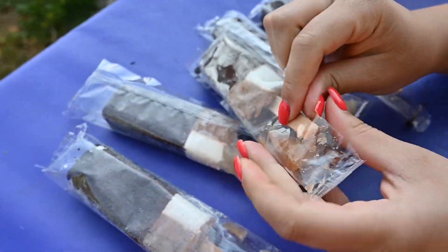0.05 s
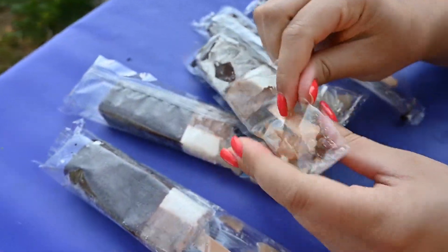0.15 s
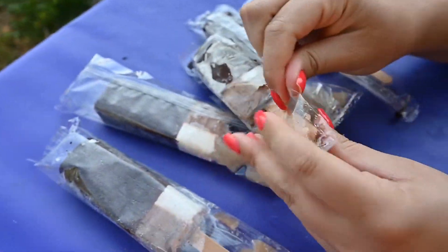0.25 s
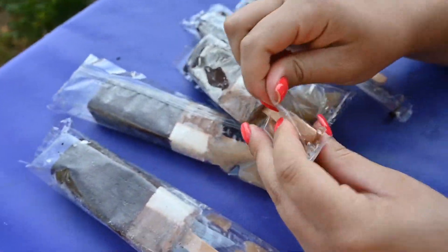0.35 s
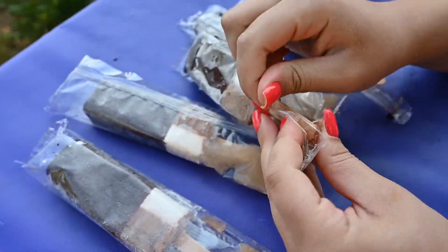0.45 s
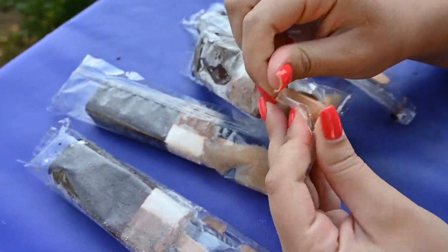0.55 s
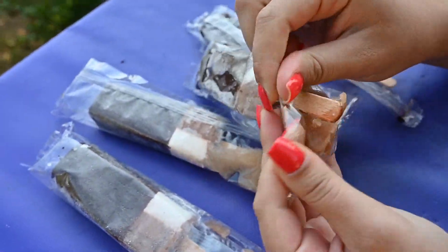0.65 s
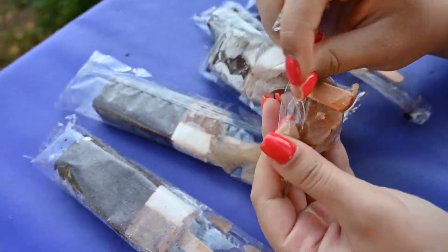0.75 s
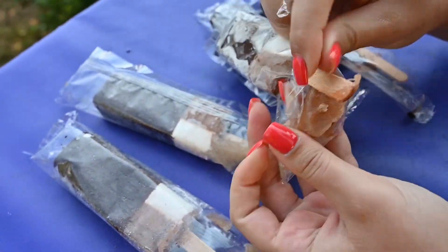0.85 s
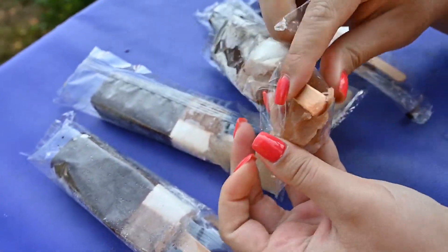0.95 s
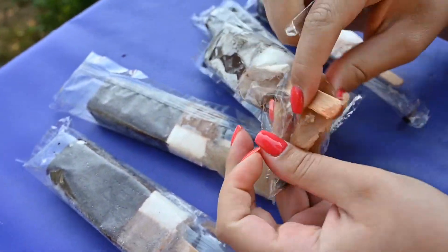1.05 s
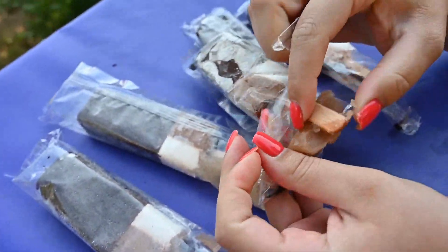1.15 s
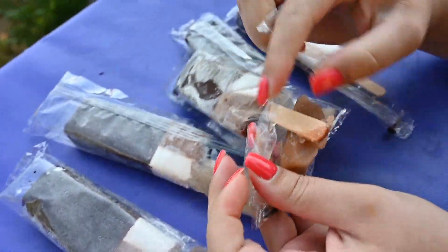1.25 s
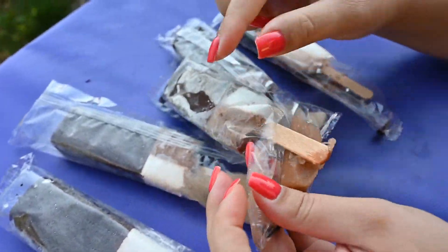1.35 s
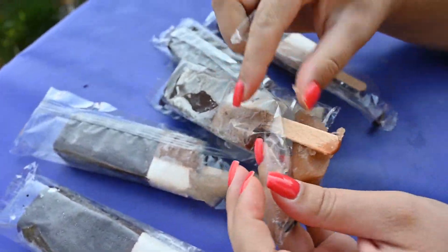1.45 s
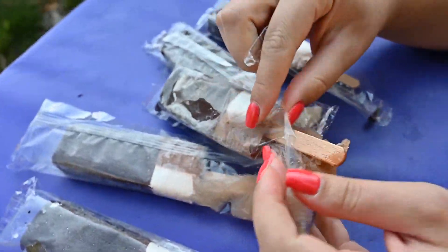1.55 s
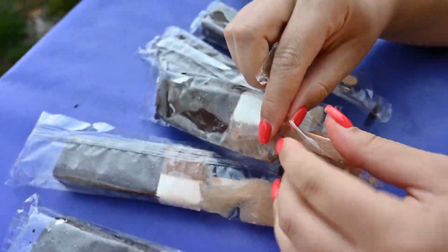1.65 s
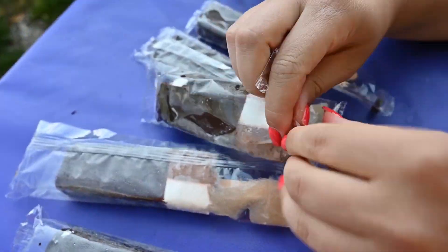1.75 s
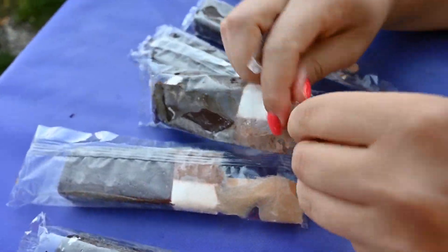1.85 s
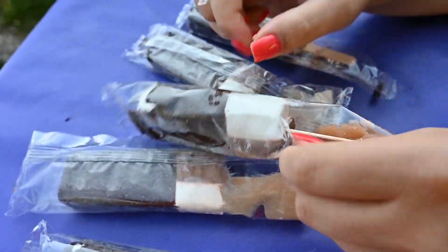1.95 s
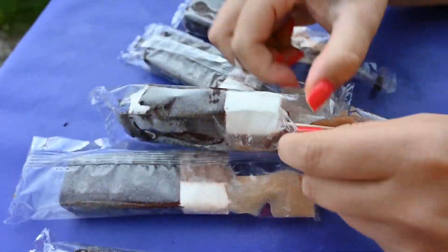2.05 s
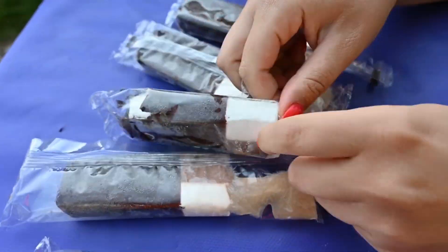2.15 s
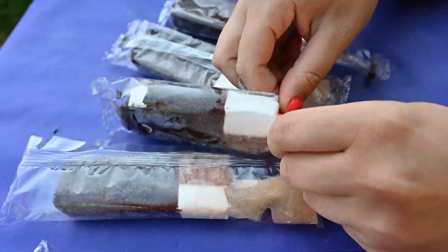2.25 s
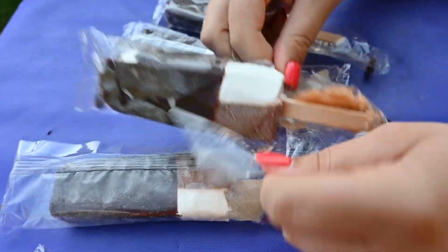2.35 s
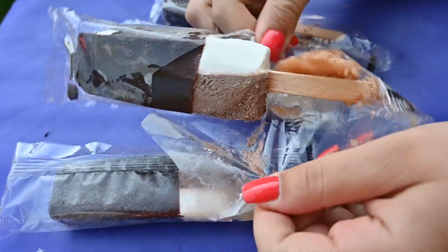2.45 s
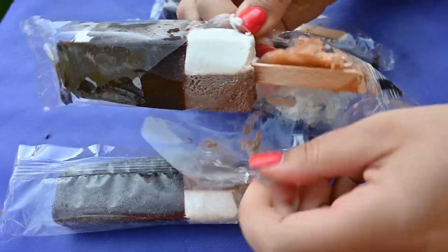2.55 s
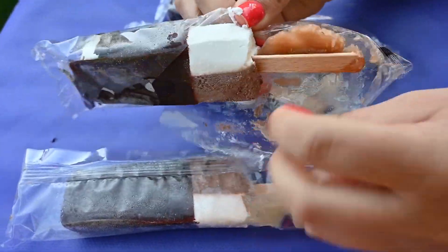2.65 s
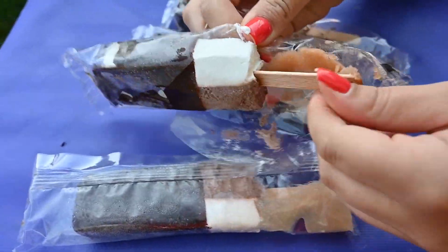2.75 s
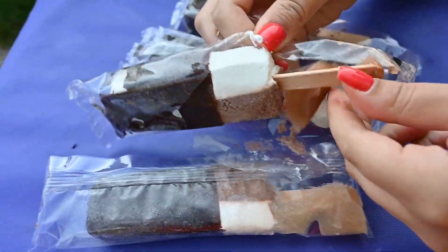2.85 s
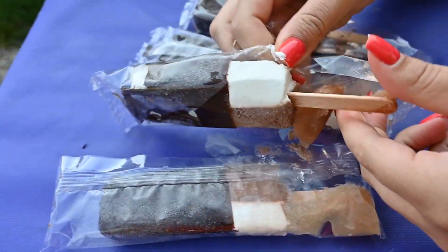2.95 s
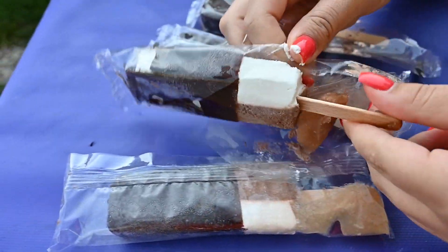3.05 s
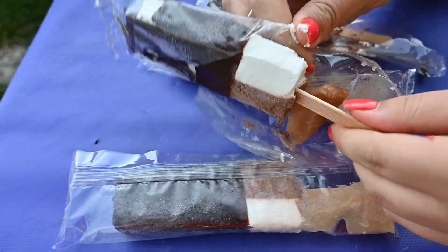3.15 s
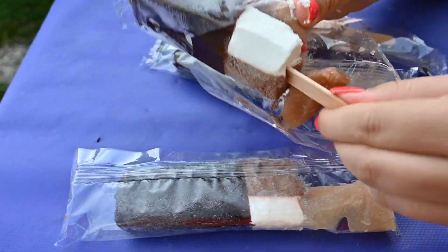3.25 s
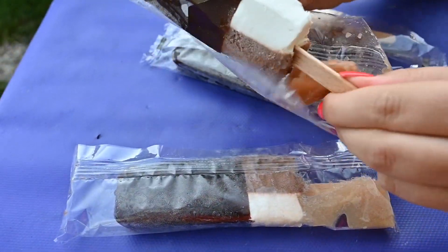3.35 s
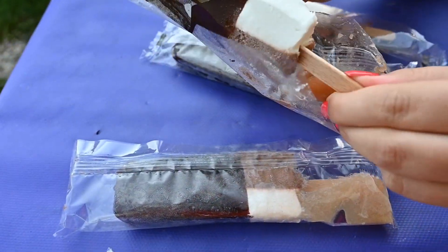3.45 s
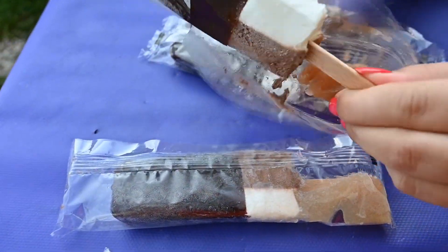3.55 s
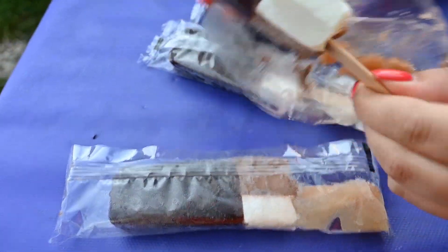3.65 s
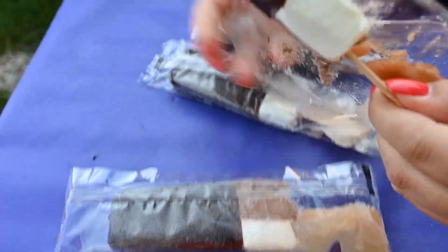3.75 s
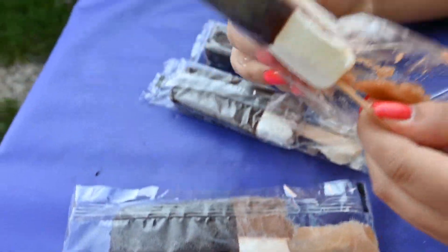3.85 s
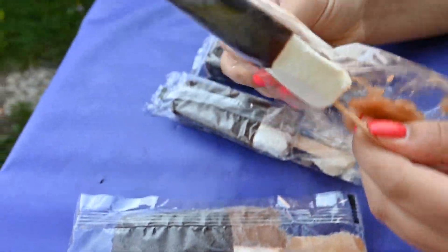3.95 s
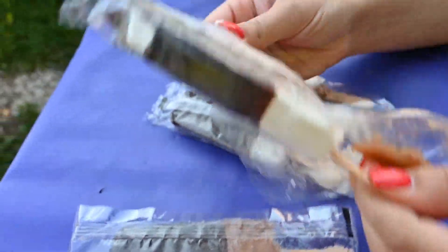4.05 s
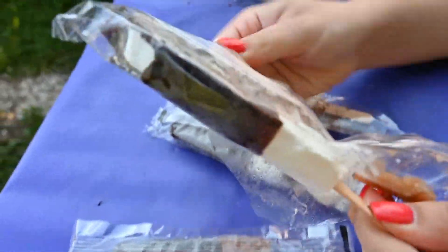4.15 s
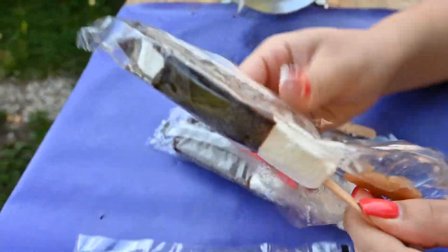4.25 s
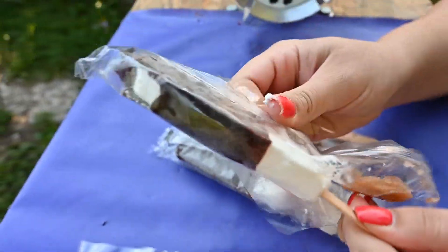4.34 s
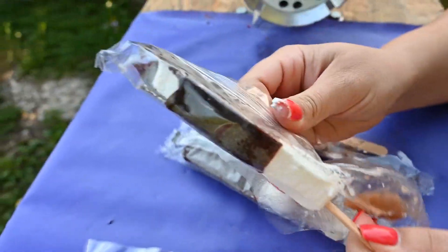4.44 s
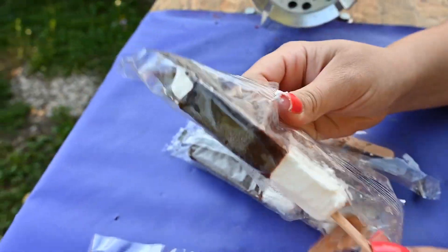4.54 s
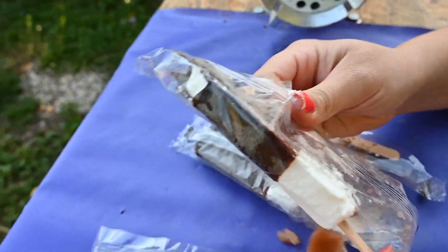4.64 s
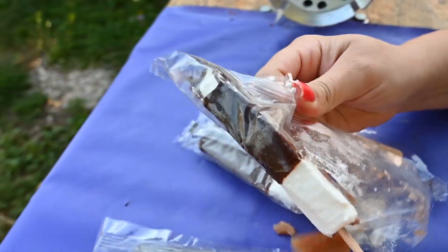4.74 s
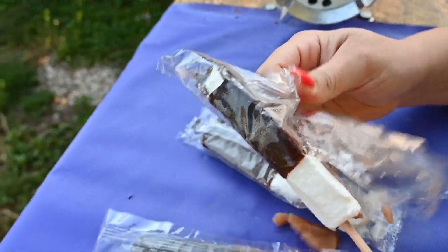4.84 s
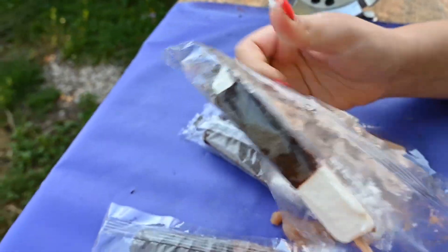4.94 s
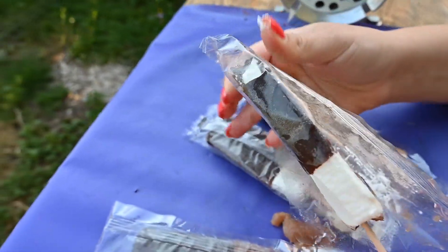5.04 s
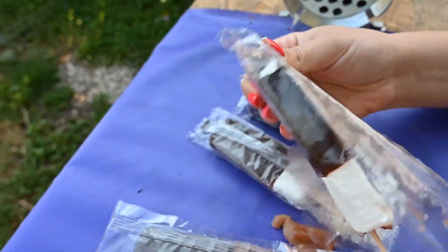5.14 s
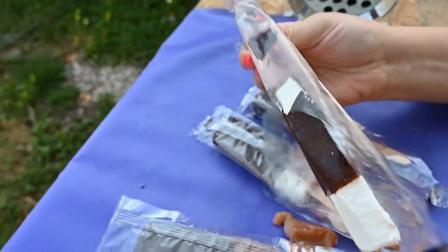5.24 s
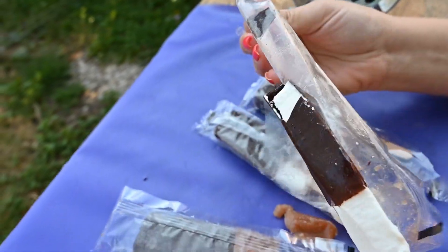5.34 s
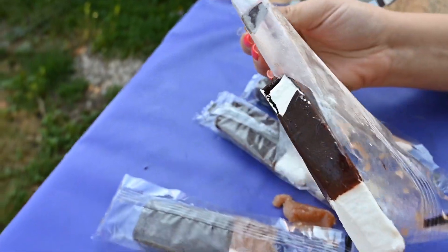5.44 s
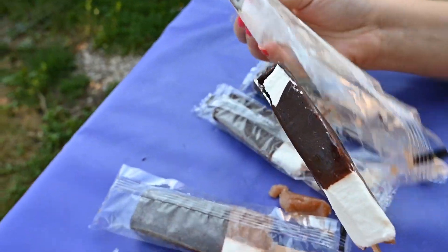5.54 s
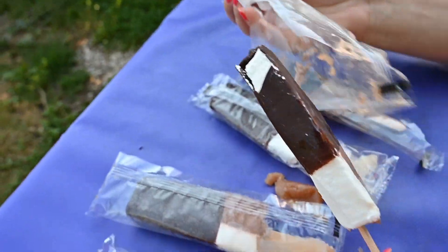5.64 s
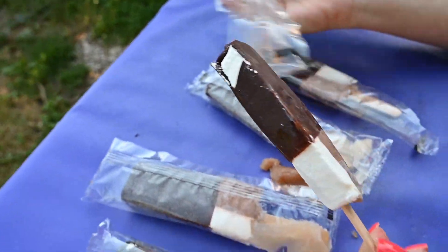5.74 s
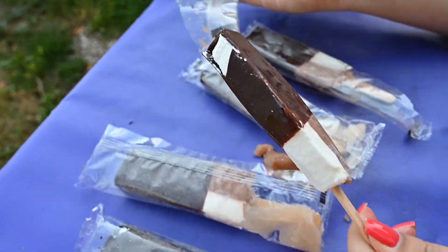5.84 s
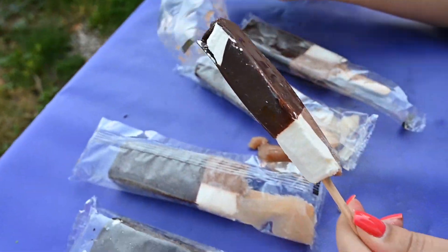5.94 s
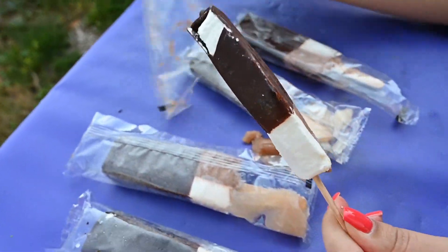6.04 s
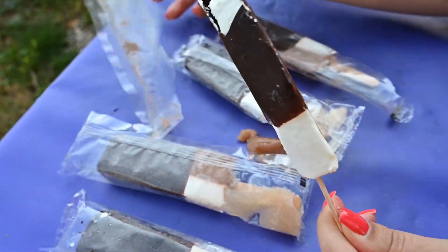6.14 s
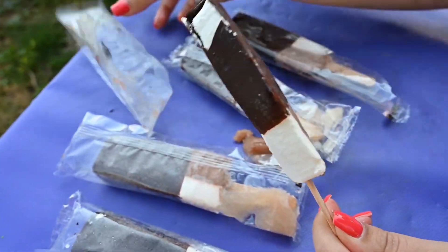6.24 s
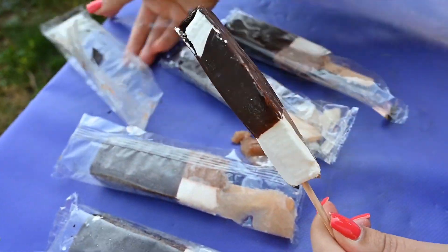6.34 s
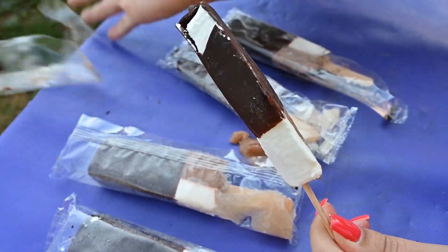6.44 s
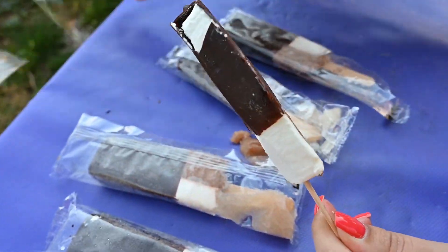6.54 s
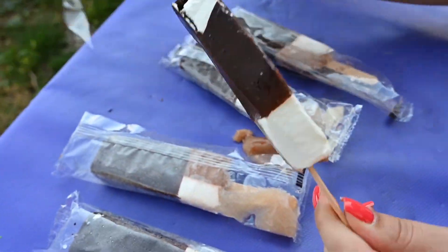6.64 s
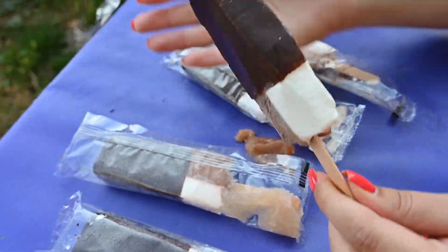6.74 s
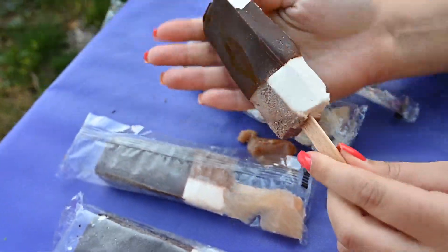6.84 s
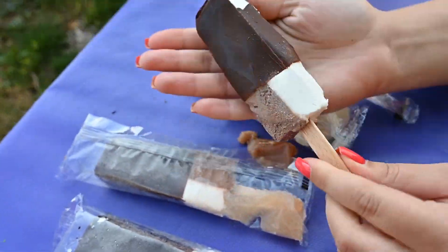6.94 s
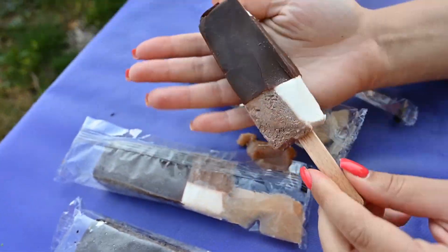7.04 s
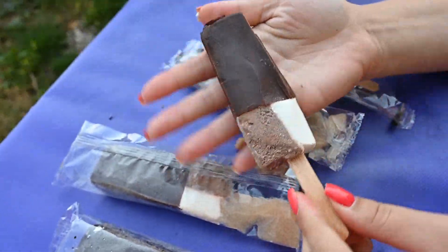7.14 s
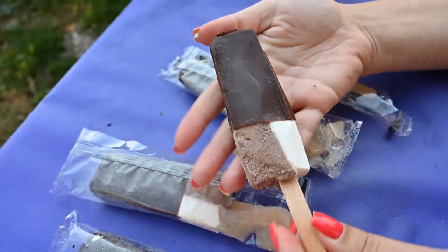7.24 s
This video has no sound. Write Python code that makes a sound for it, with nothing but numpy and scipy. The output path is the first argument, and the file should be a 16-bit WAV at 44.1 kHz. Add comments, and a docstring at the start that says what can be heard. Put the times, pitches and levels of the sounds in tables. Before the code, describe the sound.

Thin plastic wrappers crinkle and snap sharply under busy fingers outdoors, with hollow pocket pops, soft table bumps and a faint distant bird.

```python
"""Hands crinkle thin plastic wrappers on a garden table: creases buckle as noise bursts over dense crackle and rustle,
and each crease puffs through the resonant air pocket near 1 kHz, over filtered-noise rumble and slow breeze pressure.
After a second a far small bird joins in with gliding, noisy sine whistles and echoes; from 2.5 s the table top rings
to soft bumps. Just past 3 s the bag is torn open and its pocket rings lower. Near 6.2 s the breeze swells,
then the hands grow quieter while the bird calls again."""
import sys
import numpy as np
from scipy import signal
from scipy.fft import rfft, irfft, next_fast_len
from scipy.io import wavfile
from scipy.ndimage import uniform_filter1d, map_coordinates

SR = 44100
rng = np.random.default_rng(int(sys.argv[2]) if len(sys.argv) > 2 else 0)


def store_wav(level_fs):
    """Save 16-bit WAV to argv[1]."""
    pcm = np.round(np.clip(np.atleast_2d(level_fs), -1, 1) * 32767)
    wavfile.write(sys.argv[1], SR, pcm.T.astype(np.int16))


N = 321489


def amp(db):
    """Level to amplitude: 20 dB is a factor of ten."""
    return 10 ** (np.asarray(db) / 20)


def unit(x):
    """Normalisation to an RMS value of 1."""
    return x / np.sqrt(np.mean(x ** 2) + 1e-20)


def along(points, hz):
    """Interpolation of (frequency [Hz], value) points on a logarithmic frequency axis."""
    f, v = np.transpose(points)
    return np.interp(np.log(hz + 1), np.log(f + 1), v)


def curves(rows, s):
    """Linear interpolation in time: the columns after the time, read at times s."""
    t, *cols = np.transpose(rows)
    return [np.interp(s, t, c) for c in cols]


def filtered(x, response):
    """Linear filtering: the spectrum of x times a complex response, along the last axis."""
    n = x.shape[-1]
    m = next_fast_len(n + min(n, SR // 4))
    return irfft(rfft(x, m) * response(np.fft.rfftfreq(m, 1 / SR)), m)[..., :n]


def resonance(f, hz, width):
    """Damped oscillator: a causal band-pass response of gain 1 at its centre."""
    return 1j * f * width / (hz * hz - f * f + 1j * f * width + 1e-9)


def paired(x, alike):
    """Mid-side mixing: two unrelated signals become left and right with the given correlation."""
    turn = lambda hz: np.arccos(np.clip(along(alike, hz), -1, 1)) / 2
    mid, side = filtered(x, lambda hz: np.array([np.cos(turn(hz)), np.sin(turn(hz))]))
    return np.array([mid + side, mid - side])


def scatter(s, rows):
    """Superposition: short sounds summed at times s."""
    at = np.round(s * SR).astype(int)[:, None] + np.arange(rows.shape[-1])
    return np.bincount(at.ravel(), rows.ravel(), N + rows.shape[-1])[:N]


def wobble(rate):
    """Spline interpolation: a smooth random curve through `rate` random knots a second."""
    knots = rng.standard_normal(int(rate * N / SR) + 4)
    return map_coordinates(knots, [np.arange(N) * rate / SR])


def scaled_bursts(s, burst, gain):
    """Energy normalisation: each burst is scaled to its gain, then both versions are summed in time."""
    burst = burst * (gain[:, None, None] / np.linalg.norm(burst, axis=2, keepdims=True))
    return np.array([scatter(s, burst[:, 0]), scatter(s, burst[:, 1])])


def clicks(s, gain, hz, t60, sharp, broad, size=384):
    """Resonant decay: noise bursts ring at a pitch over a broad crack; two unrelated versions."""
    t = np.arange(size) / SR
    burst = rng.standard_normal((len(s), 2, size)) * amp(-60 * t / t60[:, None, None])
    hz = hz[:, None, None]
    burst = filtered(burst, lambda f: broad + resonance(f, hz, hz / sharp))
    return scaled_bursts(s, burst, gain)


def pushes(s, gain, t60, size=512):
    """Impulsive excitation: short irregular decaying pushes; two unrelated versions."""
    burst = rng.standard_normal((len(s), 2, size)) * amp(-60 * np.arange(size) / SR / t60)
    return scaled_bursts(s, burst, gain)


def wrapper():
    """Shared excitation: every crease sounds in the film and also puffs through the air pocket."""
    # filter of the film: (frequency [Hz], level [dB])
    film_colour = [(1500, -13.5), (2500, -1.5), (4000, -1.5), (6000, -1), (9000, -0.5), (13000, -0.5),
                   (16000, -6.5)]
    # left-right likeness of the wrapper: (frequency [Hz], correlation [1])
    film_alike = [(600, 1), (1500, 0.85), (4000, 0.46), (14000, 0.23)]
    crackle_db, pocket_db = handling()
    # a hard grip crackles without pause
    clump_db = np.clip(-.13 * (crackle_db + 13), 1, 3.8) * wobble(70)
    snap_film, snap_air = snaps(pocket_db - crackle_db)
    crackle_film, crackle_air = crackle(crackle_db, pocket_db, clump_db)
    rustle_film, rustle_air = rustle(crackle_db, pocket_db, clump_db)
    film = snap_film + crackle_film + rustle_film
    film = filtered(film, lambda f: amp(along(film_colour, f) + 4.5))
    air = air_pocket(snap_air + crackle_air + rustle_air) + pops()
    near = paired(film + air, film_alike)
    # the hands are a little nearer the right port: louder there, and 26 microseconds earlier
    port_gain, port_sign = amp([[-.4], [.4]]), np.array([[-1], [1]])
    return filtered(near, lambda f: port_gain * np.exp(1j * np.pi * f * 2.6e-5 * port_sign))


def handling():
    """Power addition: squeezes rise, hold and let go over the held film; returns crackle and pocket levels."""
    # squeezes and tugs: (start [s], length [s], relative crackle level [dB], pocket level against crackle [dB])
    squeezes = [(.056, 0.046, -37, -5), (.231, 0.081, -35, -4), (0.344, 0.17, -41, -6),
                (.67, 0.049, -34.5, -28), (1.311, 0.05, -39, -9), (1.549, 0.25, -42, -5.5),
                (1.922, 0.26, -37, -6.5), (2.151, .2, -34, -4), (2.371, 0.055, -22.5, -4.5),
                (2.436, 0.054, -23.5, 0.5), (2.558, 0.012, -31, -3.5), (2.602, 0.024, -28, -5),
                (2.641, 0.033, -27, 0), (2.68, .23, -43, -6), (3.185, 0.09, -45, -7.5),
                (3.4, 0.081, -33, -5.5), (3.631, 0.032, -32.5, -1.5), (3.872, 0.072, -38, -6.5),
                (3.981, 0.12, -44, -6), (4.119, 0.031, -33.5, -6.5), (4.314, 0.14, -40, -2.5),
                (4.446, 0.029, -34, -4), (4.574, 0.057, -28.5, -9), (4.773, 0.019, -31, -1.5),
                (4.796, 0.09, -38, -6), (4.948, 0.077, -31, -4.5), (5.232, .058, -29, -8.5),
                (5.323, 0.069, -39, 3.5), (5.519, 0.06, -46.5, -5.5), (5.889, 0.0444, -35.5, -6.5),
                (6.13, 0.0294, -45, 2), (6.418, 0.093, -44.5, -0.5), (7.13, 0.047, -58, 8.5)]
    # crackle of the film merely held between squeezes: (time [s], relative level [dB])
    holding = [(0, -42), (.2, -46), (.6, -42), (1.12, -43), (1.52, -53.5), (1.88, -50), (2.52, -39),
               (3, -44.5), (3.1, -50.5), (3.8, -55), (4.25, -67.5), (4.52, -45.5), (5.3, -44),
               (5.44, -54.5), (5.68, -61), (5.8, -50), (6, -59.5), (6.54, -48.5), (6.65, -84), (6.85, -58),
               (7.29, -63.5)]
    holding_pocket_db = -4.5  # air pocket against that crackle
    grab_s, let_go_db_per_s = 0.0082, 916  # rise of a squeeze, fall after it
    t = np.arange(N) / SR
    held = amp(2 * curves(holding, t)[0])  # twice the dB gives power
    crackle_power, pocket_power = held.copy(), held * amp(2 * holding_pocket_db)
    for s, length, db, pocket_db in squeezes:
        near = slice(round((s - grab_s) * SR), round((s + length) * SR) + SR // 10)
        u = t[near] - s
        rise = np.clip(u / grab_s + .5, 0, 1) ** 2
        power = rise * amp(2 * (db - let_go_db_per_s * np.maximum(u - length, 0)))
        crackle_power[near] += power
        pocket_power[near] += power * amp(2 * pocket_db)
    return 10 * np.log10([crackle_power, pocket_power])


def snaps(puff_db):
    """Snap-through buckling: big creases release sharp bursts and push the enclosed air."""
    # big snaps: (time [s], relative energy level [dB], crease pitch [Hz])
    snap_events = [(0.1558, -12, 3550), (0.1813, -7.5, 4100), (0.251, -6.5, 3400), (0.2743, -5, 3508),
                   (0.3075, -0.5, 4600), (0.4114, -6.5, 5310), (0.43, -6, 6230), (0.461, -1, 11000),
                   (0.488, -5, 8600), (0.5336, 1, 4700), (0.5756, -9, 5740), (0.6743, -4.5, 10090),
                   (0.704, -4, 6600), (0.867, -7.5, 3524), (0.9047, 1, 8500), (0.952, -8, 5800),
                   (1.002, -6.5, 7240), (1.0431, -7, 7640), (1.103, -8.5, 5900), (1.1479, -10, 5740),
                   (1.5547, -4.5, 3070), (1.7165, -6, 6140), (1.9874, -3, 6686), (2.0082, -1, 2250),
                   (2.0167, -1.5, 6360), (2.1475, -7.5, 3390), (2.1927, 2, 8750), (2.4472, 3, 3459),
                   (2.775, 0.5, 6600), (2.8233, -4, 5650), (3.0305, -7, 9100), (3.0708, -7.5, 4530),
                   (3.1962, -3, 9475), (3.223, -10.5, 3140), (3.2395, -9, 9030), (3.2688, -3.5, 6550),
                   (3.3267, -8.5, 6067), (3.401, -4.5, 4900), (3.406, 4, 9160), (3.4448, -4, 8710),
                   (3.469, 0, 6300), (3.5243, 3.5, 7600), (3.6392, -9, 8100), (3.7213, -16, 11900),
                   (3.869, -8.5, 3420), (3.88, -9.5, 9300), (3.9183, 0.5, 6260), (3.9301, -4, 11000),
                   (3.9438, -3.5, 5788), (3.998, -3, 5950), (4.0253, -6, 3120), (4.039, 1, 8000),
                   (4.122, -4, 3180), (4.131, -4, 6700), (4.1845, -6, 4603), (4.3187, -7, 6150),
                   (4.4086, -2, 6700), (4.4902, -5, 9754), (4.6, 0.5, 10100), (4.668, -8.5, 3653),
                   (4.7744, -3, 9700), (4.781, 3, 9600), (4.787, 0.5, 9930), (4.8195, -3, 10400),
                   (4.8423, 7, 9390), (4.8503, -2, 5200), (4.8797, -2.5, 6200), (4.982, -4, 3920),
                   (5.1929, -3.5, 5650), (5.2168, -2.5, 3000), (5.281, -6.5, 6900), (5.356, -6, 6500),
                   (5.3753, -4, 4120), (5.729, -20.5, 6527), (5.817, -5, 5500), (5.894, 2, 7760),
                   (5.926, -3.5, 3200), (5.982, -15.5, 6110), (6.157, -11.5, 2920), (6.261, -11, 3600),
                   (6.294, -6, 2580), (6.349, -9.5, 3220), (6.4597, -5, 6230)]
    s, db, hz = np.transpose(snap_events)
    film = clicks(s, amp(db), hz, np.full(len(s), .009), sharp=2.16, broad=0.36)
    # a weak, softer noise burst 3.5 ms ahead of each snap softens its onset
    film += clicks(s - .0035, amp(db - 16.5), hz, np.full(len(s), .02), sharp=3.0, broad=0.46)
    air = pushes(s, amp(db + puff_db[(s * SR).astype(int)] - 11.5), t60=0.016)
    return film, air


def crowd(level_db, clump_db, count, spread_db, busy_db):
    """Random point process: rare large sizes, louder in clumps; soft grips set off fewer creases."""
    at, size, luck = rng.integers(0, N, count), rng.exponential(1, count), rng.random(count)
    gain = unit(amp(np.minimum(spread_db * size, 11.5) + clump_db[at]))
    share = np.clip(amp(.7 * (level_db[at] - busy_db)), .3, 1)
    keep = luck < share
    # fewer creases are each made stronger, for a mean power near 1 a sample
    return at[keep], (gain * np.sqrt(N / count / share))[keep]


def crackle(crackle_db, pocket_db, clump_db):
    """Crackling noise: a crowd of small buckling creases, each with its own pitch and decay."""
    at, gain = crowd(crackle_db, clump_db, count=5000, spread_db=2.5, busy_db=-29)
    s = at / SR
    # harder grips buckle smaller, higher creases
    hz = 6500 * np.exp(rng.normal(0, 0.67, len(s)) + 0.025 * (crackle_db[at] + 33.5))
    t60 = .014 * np.exp(rng.normal(0, .55, len(s)))
    # a barely moving film only rustles
    gain = gain * amp(2 * np.minimum(crackle_db[at] + 54, 0))
    film_gain = gain * amp(crackle_db[at] + 0.5)
    film = clicks(s, film_gain, np.clip(hz, 2000, 15000), t60, sharp=3.5, broad=.28)
    # the pocket changes shape under the fingers, so each puff has its own pitch
    puff_hz = 1150 * np.exp(rng.normal(0, 0.5, len(s)))
    puff_gain = gain * amp(pocket_db[at] - 13 + rng.normal(0, 2.13, len(s)))
    air = clicks(s, puff_gain, puff_hz, np.full(len(s), .012), sharp=2, broad=0.089)
    return film, air


def rustle(crackle_db, pocket_db, clump_db):
    """Sliding friction: skin on the film makes a duller noise that also stirs the pocket."""
    sliding = filtered(rng.standard_normal((2, N)), lambda f: 1 / (1 + 1j * f / 5000)) * amp(clump_db)
    # a steady, dull brushing fills the gaps
    brushing = filtered(rng.standard_normal((2, N)), lambda f: resonance(f, 2800, 3200) ** 2)
    film = amp(crackle_db - 2.0) * sliding + amp(0.75 * crackle_db - 16) * brushing
    return film, amp(pocket_db - 9) * sliding


def air_pocket(air):
    """Cavity resonance: the air in the bag rings in several modes, all lower once it is torn open."""
    # modes of the air pocket: (centre [Hz], width [Hz], relative level [dB])
    pocket_modes = [(112, 7500, -17.5), (840, 585, 0), (1233, 485, 3), (1700, 510, 1.5)]
    opened_s, opening_s, open_pitch = 3.12, 1, 0.86  # middle and length of the tearing, pitch ratio after it

    def pocket(f):
        """Modal sum: resonances added with alternating sign."""
        modes = ((-1) ** k * amp(g) * resonance(f, c, w) for k, (c, w, g) in enumerate(pocket_modes))
        return amp(15.5) * sum(modes)

    # equal-power fade from the closed to the open pocket
    opened = np.pi / 2 * np.clip((np.arange(N) / SR - opened_s) / opening_s + .5, 0, 1)
    closed_air = filtered(air * np.cos(opened), pocket)
    return closed_air + filtered(air * np.sin(opened), lambda f: pocket(f / open_pitch))


def pops():
    """Free decay of a cavity: hollow pops of the air pocket, each at its own pitch."""
    # hollow pops: (time [s], relative level [dB], pitch [Hz])
    pop_events = [(0.238, -25.5, 1060), (0.434, -24, 1100), (0.951, -28.5, 896), (1.626, -25.5, 1170),
                  (2.24, -23.5, 1090), (2.428, -11.5, 1130), (2.469, -17.5, 790), (2.611, -16, 1010),
                  (2.886, -25, 1170), (3.069, -22.5, 1043), (3.406, -29.5, 1040), (3.809, -31, 1140),
                  (4.731, -23.5, 1180), (5.007, -17, 1070)]
    s, db, hz = np.transpose(pop_events)
    return clicks(s, amp(db + 17.5), hz, np.full(len(s), .012), sharp=8.6, broad=0.041, size=768)


def table():
    """Forced plate resonance: each bump is a rough push that the table top answers near 280 Hz."""
    # soft bumps on the table top: (time [s], relative level [dB])
    bump_events = [(2.474, -33), (4.965, -30), (6.345, -34.5), (6.455, -33)]
    s, db = np.transpose(bump_events)
    push = pushes(s, amp(db), t60=.2, size=4096)
    top = filtered(push, lambda f: resonance(f, 280, 170) - 0.19 * resonance(f, 110.1, 130))
    return amp(42.0) * paired(top, [(250, 0.99)])


def bird():
    """Frequency modulation: noisy gliding sines, mostly falling, smeared by echoes from the trees."""
    # falling phrase: (time after its start [s], length [s], first pitch [Hz], last pitch [Hz], relative level [dB])
    phrase = [(0, .04, 6070, 5450, -6), (0.026, 0.067, 4890, 3890, 2), (0.09, 0.026, 3080, 3970, -4),
              (0.108, .034, 3900, 2600, 1.5), (0.152, 0.042, 3800, 2624, -7)]
    # calls of that phrase: (start [s], relative level [dB])
    calls_at = [(1.371, -47), (5.745, -45), (6.897, -47.5)]
    # strands into which each whistle splits: (pitch ratio [1], level [dB])
    strands = [(1.001, 1), (1.6, -16)]
    # single whistles: (start [s], length [s], first pitch [Hz], last pitch [Hz], relative level [dB])
    whistles = [(5.611, .055, 4370, 4440, -57), (6.822, .06, 4140, 3500, -61)]
    song = np.zeros(N + SR)
    notes = [(start + s, *shape, call_db + db) for start, call_db in calls_at for s, *shape, db in phrase]
    for s, length, first_hz, last_hz, db in notes + list(whistles):
        u = np.linspace(0, 1, round(length * SR))
        glide_hz = first_hz + (last_hz - first_hz) * u
        for ratio, strand_db in strands:
            # random pitch jitter makes the whistle husky
            jitter_hz = 1600 * uniform_filter1d(rng.standard_normal(len(u)), size=60)
            phase = 2 * np.pi * np.cumsum(ratio * glide_hz + jitter_hz) / SR
            song[round(s * SR):][:len(u)] += amp(db + strand_db) * np.sin(np.pi * u) * np.sin(phase)
    song = song[:N] * amp(2.5 * wobble(90))
    t = np.arange(SR // 3) / SR
    tail = rng.standard_normal((2, len(t))) * amp(-60 * t / 0.26)
    echo = signal.fftconvolve(song[None], tail / np.linalg.norm(tail[0]), axes=1)
    # the direct song is stronger on the left
    return song * np.array([[1], [.4]]) + amp(-3) * echo[:, :N]


def garden():
    """Partial coherence: far rumble and leaves as noise, and slow breeze pressure unrelated between the ports."""
    # spectrum of the far sound: (frequency [Hz], relative level [dB per Hz])
    far_colour = [(20, 7), (60, -2.5), (250, -11), (700, -15), (1500, -17), (4000, -23.5), (7000, -29),
                  (16000, -29.5)]
    # left-right likeness of the far sound: (frequency [Hz], correlation [1])
    far_alike = [(30, .6), (150, .93), (640, .8), (1400, .36), (3000, 0)]
    # breeze on the microphone ports: (time [s], level [dB])
    breeze = [(0, -54), (.6, -42), (2.2, -51.5), (5.95, -54), (6.17, -37), (6.4, -52)]
    far = paired(filtered(rng.standard_normal((2, N)), lambda f: amp(along(far_colour, f))), far_alike)
    puffs = filtered(rng.standard_normal((2, N)), lambda f: resonance(f, 9, 6.8) ** 2)
    far_db = -52 + 1.2 * wobble(3)
    breeze_db = curves(breeze, np.arange(N) / SR)[0]
    return amp(far_db) * unit(far) + amp(breeze_db) * unit(puffs)


def scene():
    """Superposition of all sources at the two microphone ports."""
    return wrapper() + table() + bird() + garden()


def record(dry):
    """Saturation and band limiting: peaks clip near full scale, and nothing from 16.1 kHz up is kept."""
    top_hz = 16100
    return filtered(np.clip(dry, -.9, .9), lambda hz: hz < top_hz)


dry = scene()
out = record(dry)
store_wav(out)
```